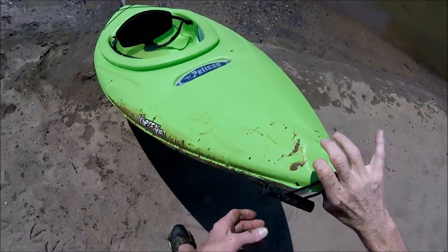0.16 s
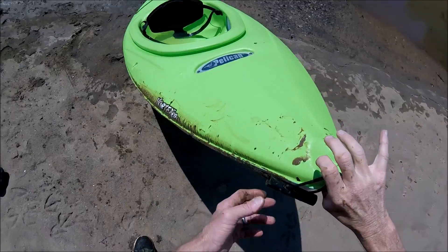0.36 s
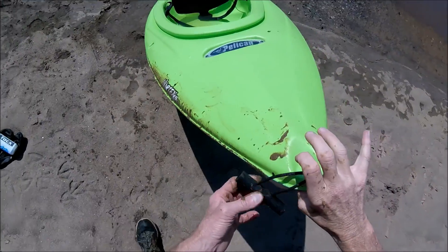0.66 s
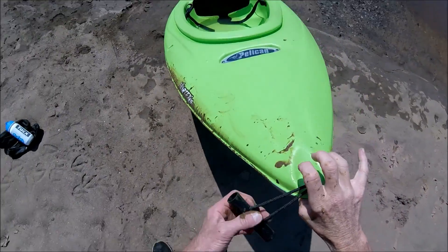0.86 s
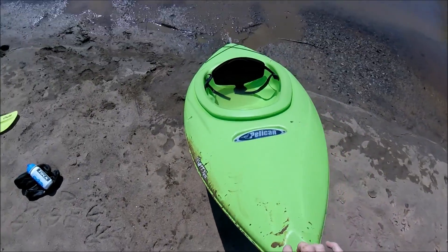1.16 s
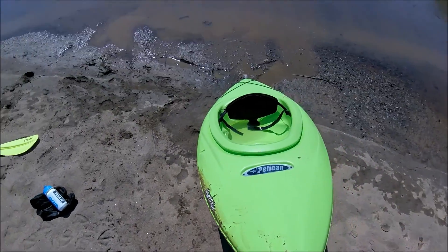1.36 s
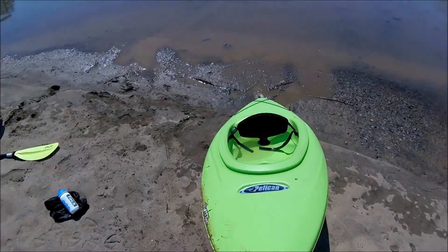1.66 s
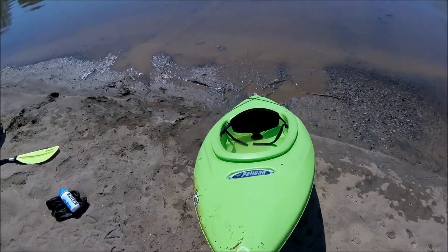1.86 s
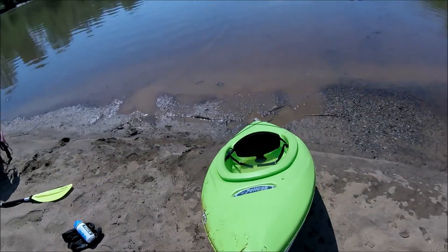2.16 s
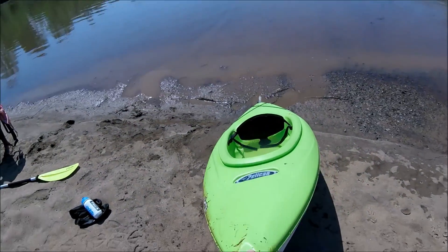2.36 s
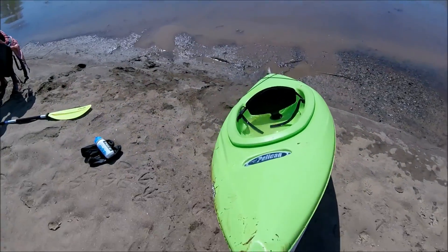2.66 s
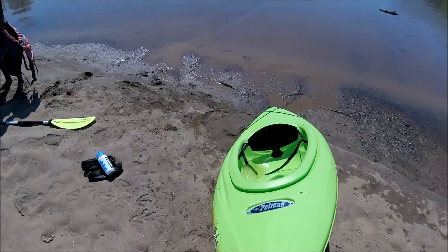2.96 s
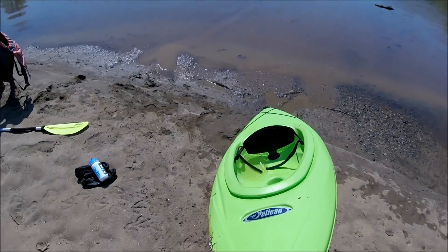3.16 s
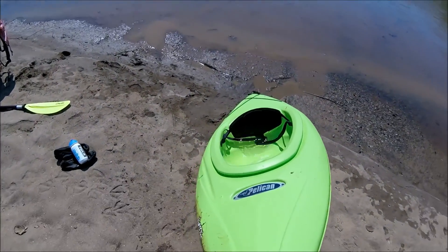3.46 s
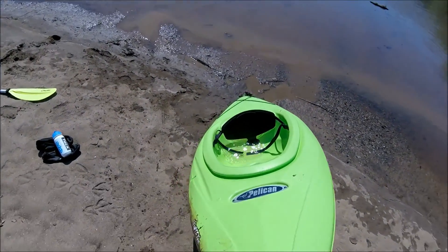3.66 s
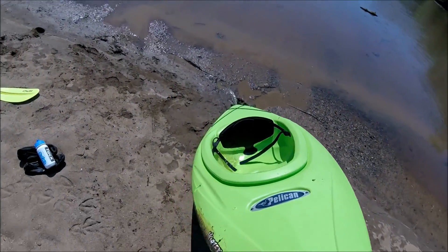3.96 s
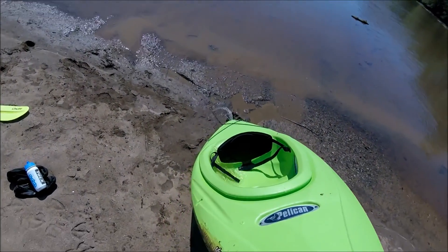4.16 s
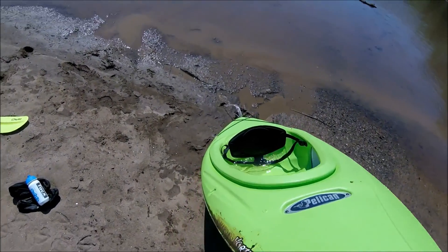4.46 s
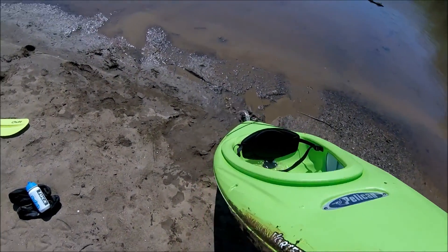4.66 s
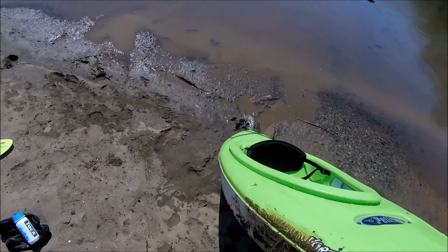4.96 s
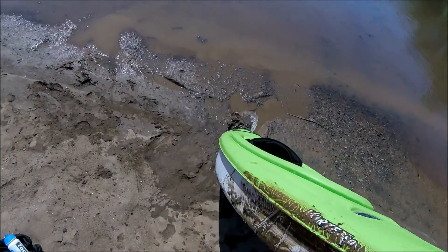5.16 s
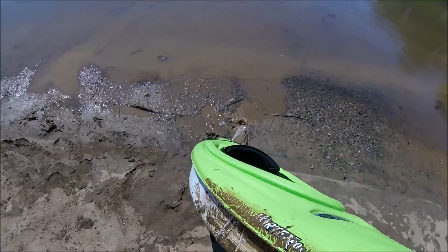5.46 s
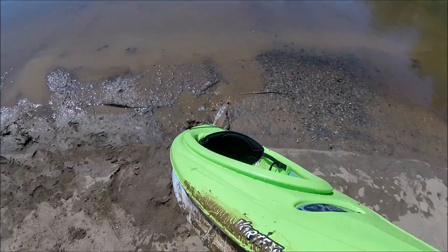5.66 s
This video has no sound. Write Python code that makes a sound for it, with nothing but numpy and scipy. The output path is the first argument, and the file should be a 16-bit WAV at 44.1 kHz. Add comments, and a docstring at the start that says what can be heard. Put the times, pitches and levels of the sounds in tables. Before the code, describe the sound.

For almost three seconds there is little but breeze rumble, faint air hush and scattered tiny bubble ticks in wet mud. Then a light hollow plastic hull is moved over sand: a hard crack, dull boxy knocks, short scuffs and low grating. Toward the end the knocks thin out and water trickles, plips and crackles with small stones. Near, dry, open-air perspective with wind on the microphone.

```python
"""A breeze of low-passed noise buffets the microphone over a steady hush, while bubble notes tick in wet mud.
The air in a hollow plastic kayak booms as a hand takes hold, then the hull slides down a wet sandy bank:
noise and grains hiss and crunch as sand, and coarse catches make the hull grumble.
Soon blows knock it into clicks, clacks and ringing modes, with jerky scuffs and soft thuds of its floor.
Toward the end water sloshes as swarms of tiny bubbles, with wet plips, droplets and ticking stones."""
import sys
import numpy as np
from scipy import signal
from scipy.fft import rfft, irfft, next_fast_len
from scipy.io import wavfile
from scipy.ndimage import uniform_filter1d, minimum_filter1d, map_coordinates

SR = 44100
rng = np.random.default_rng(int(sys.argv[2]) if len(sys.argv) > 2 else 0)


def master_out(mix):
    """Clip the mix to full scale and print it as 16-bit PCM to the path in sys.argv[1]."""
    frames = np.transpose(np.atleast_2d(mix))
    ceiling = np.clip(frames, -1, 1)
    pcm = np.round(ceiling * 32767).astype(np.int16)
    wavfile.write(sys.argv[1], SR, pcm)


N = 255824

# Blows on the hull. Each row: start in seconds, relative ring level in dB, contact click level in dB,
# treble gain on both in dB, struck panel's pitch in Hz, its level in dB, clack level in dB, clack pitch in Hz.
BLOWS = [(2.918, -31.5, -25, -21, 423, -36, -37, 700), (3.088, -30.5, -28.5, 7, 1540, -49, -38, 600),
         (3.209, -34, -49, -15, 298, -31, -44, 400), (3.378, -29, -41, -15, 990, -35, -34, 800),
         (3.415, -24, -52.5, 0, 1230, -23.5, -42, 900), (3.544, -29, -48, -16, 535, -27, -45, 600),
         (3.6426, -12.5, -5, 7, 422, -25, -12, 945), (3.6499, -28, -28, 4, 729, -21, -21, 1000),
         (3.6641, -35, -29, 2, 484, -28, -16, 1100), (3.754, -31.5, -35, -14, 695, -34.5, -32, 700),
         (3.859, -25, -39, 3, 1190, -24.5, -30, 1100), (4.004, -23.5, -14.5, -12, 2570, -38, -23, 1100),
         (4.012, -39, -26, 2, 4020, -35.5, -24.5, 1300), (4.1069, -22.5, -20.5, -26, 3000, -39, -21, 765),
         (4.271, -25, -25, -17, 786, -40, -26, 1100), (4.316, -25.5, -32, -18, 520, -28, -20.5, 660),
         (4.3604, -25, -18, -23, 550, -29, -19.5, 910), (4.401, -23, -22, -21, 547, -27, -23.5, 735),
         (4.505, -32, -36, -12, 1320, -44, -30, 1210), (4.618, -30, -17, -22, 509, -31, -30, 990),
         (4.7814, -27, -19, -8, 1630, -33, -26, 1170), (4.889, -36, -50, -15, 685, -37, -42, 800),
         (5.1428, -30, -19, -4, 704, -35, -21.5, 1500), (5.2036, -30.5, -23.5, -15, 269, -26.5, -19, 556),
         (5.332, -40, -40, -10, 447, -38, -43, 600), (5.515, -38, -39, -17, 937, -44, -38, 900)]
# Modes of the hull. Each row: pitch in Hz, relative level in dB, 60 dB decay time in seconds.
HULL_MODES = [(170, -9, .15), (256, -5, .14), (323, 2.5, .12), (420, .5, .13), (490, -4, .11),
              (530, -4, .11), (605, 1.5, .07), (754, -3, .17), (868, -7, .13), (1007, -13, .14),
              (1045, -7, .1), (1290, -3, .08), (1383, -5, .07), (1464, -15, .11), (1750, -8, .085),
              (1840, -7, .08), (2060, -9, .05), (2412, -10.5, .055), (3030, -11, .04), (3898, -10.5, .04),
              (4140, -13, .05)]
# The crowd of weaker shell modes. Each row: frequency in Hz, relative level in dB per Hz.
SHELL_SPECTRUM = [(40, -9), (160, 2), (350, 6), (750, -0.5), (1020, 4), (1260, 2), (1550, -3), (2100, -3),
                  (2750, -9), (3900, -5.5), (5000, -16), (6500, -21), (7800, -24), (14000, -27)]
# How long the shell modes last. Each row: frequency in Hz, 60 dB decay time in seconds.
SHELL_DECAY = [(200, 0.23), (1000, 0.15), (3000, 0.089), (9000, 0.011)]
# Colour of the contact click. Each row: frequency in Hz, relative level in dB per Hz.
CLICK_SPECTRUM = [(60, -34), (300, 16.5), (800, 10), (1600, 5), (3200, 6.5), (5000, -2.5), (6500, 1.5),
                  (8000, -6.5), (11300, -9.5), (12300, -99), (14000, -69)]
# Jerky scuffs of plastic on grit. Each row: start in seconds, length in seconds, level in dB, pitch in Hz.
SCUFF_EVENTS = [(.016, 0.024, -48, 1160), (3.207, 0.017, -47.5, 3600), (3.415, 0.029, -45.5, 2230),
                (3.483, .012, -41.5, 2140), (3.493, 0.022, -44.5, 1280), (3.501, 0.0093, -51, 3300),
                (3.869, 0.014, -44, 2480), (4.24, 0.065, -44, 1240), (4.362, .02, -39.5, 1690),
                (4.494, 0.023, -42.5, 1320), (4.625, 0.017, -39, 2680), (4.781, 0.0064, -39, 3400)]
# Slow flexing of the hull floor. Each row: start in seconds, peak level in dB, starting pitch in Hz.
FLOOR_THUDS = [(3.868, -28, 88), (3.898, -26, 156), (4.011, -37, 121), (4.313, -28, 90), (5.204, -35, 230)]
# Shoves of the hull over the sand. Each row: start in seconds, rise in seconds, fall in seconds,
# relative sand hiss level in dB, relative hull grumble level in dB.
SHOVE_EVENTS = [(2.24, 0.47, 0.3, -51.5, -47.5), (2.52, 0.29, 0.16, -51, -52.5),
                (3.07, 0.013, 0.36, -53.5, -52), (3.19, 0.024, 0.06, -65, -39.5),
                (3.25, 0.044, 0.45, -59, -44), (3.482, 0.0045, 0.082, -51.5, -63),
                (3.83, 0.07, 0.04, -58, -41), (4.17, 0.083, 0.15, -49, -46),
                (4.37, 0.041, 0.59, -55.5, -42.5), (4.71, 0.018, 0.05, -59, -70),
                (4.87, 0.0078, 0.37, -82, -45.5), (5.2, 0.034, 0.4, -60.5, -43),
                (5.32, 0.091, 0.37, -55, -51.5), (5.43, 0.097, 0.059, -56, -40),
                (5.58, 0.046, 0.31, -60, -66)]
# Colour of the sand's hiss. Each row: frequency in Hz, relative level in dB per Hz.
SAND_SPECTRUM = [(60, -22), (250, 10), (500, -6.5), (1000, 0), (1600, -1), (2250, 1.5), (2950, -3.5),
                 (3750, -0.5), (4800, -8.5), (6200, -8), (7200, -21.5), (9000, -23), (11000, -33),
                 (14000, -54)]
# Colour of the hull's grumble. Each row: frequency in Hz, relative level in dB per Hz.
GRUMBLE_SPECTRUM = [(30, -33), (90, 7), (170, 8), (250, 0.5), (320, 5), (520, -0.5), (750, -6), (1300, -18),
                    (2200, -16.5), (3200, -35), (10000, -42)]
# The hand takes hold of the hull. Each row: start in seconds, rise in seconds, fall in seconds, boom level in dB.
HAND_GRIPS = [(.35, 0.27, 0.8, -48)]
# Sloshes of water and wet mud. Each row: start in seconds, rise in seconds, fall in seconds, relative level in dB.
SLOSH_EVENTS = [(0, 0.03, 0.071, -49), (0, 0.36, 3, -55), (3.36, 0.11, 0.33, -55), (4.2, 0.19, 1.1, -47.5),
                (4.9, 0.3, 0.3, -51), (5.35, 0.38, 0.28, -48.5)]
# Colour of droplets and splashes. Each row: frequency in Hz, relative level in dB per Hz.
SPATTER_SPECTRUM = [(300, 9.5), (1500, -30), (3500, 13.5), (5000, 0), (6500, 0), (8000, -11.5),
                    (11300, -14), (14000, -30)]
# Single bubbles and wet ticks. Each row: start in seconds, peak level in dB, pitch in Hz,
# pitch rise as a share (negative falls), length in cycles.
SINGLE_BUBBLES = [(.0074, -44, 2240, 0.1, 13), (.116, -41.5, 2250, -0.11, 10),
                  (.1406, -45, 2220, 0.00072, 11), (0.2215, -46.5, 4020, 0.24, 40),
                  (0.296, -52, 2920, 0.76, 7.3), (0.769, -47, 3820, -0.32, 14),
                  (.817, -51, 1720, -0.33, 12), (0.873, -44.5, 3100, 0.15, 27),
                  (0.8747, -40, 1760, -0.041, 5.7), (.888, -46, 3870, 0.3, 22), (1.324, -45, 3520, 0.6, 16),
                  (3.305, -39.5, 2380, -0.05, 18), (4.193, -36.5, 1770, 0.27, 11),
                  (4.649, -42, 3000, -0.0022, 13.6), (4.7591, -34, 2460, -0.083, 5.5),
                  (4.9706, -40, 2100, -0.12, 14), (5.0474, -45, 2980, 0.36, 13),
                  (5.074, -36, 3360, 0.18, 21), (5.166, -33, 3580, -0.14, 10),
                  (5.183, -34.5, 1680, 0.4, 15), (5.206, -36, 2900, 0.94, 21),
                  (5.2604, -39.5, 3640, -0.13, 15), (5.368, -31, 2240, 0.065, 5.2),
                  (5.422, -33, 3800, -0.51, 7.3), (5.45, -38, 3620, 0.21, 24),
                  (5.465, -32.5, 3780, 0.25, 15), (5.498, -31.5, 2700, -0.047, 11),
                  (5.5794, -35.5, 3130, -0.58, 14), (5.618, -35, 3400, 0.33, 16),
                  (5.637, -42, 3050, -.15, 22), (5.6605, -34, 1550, 0.46, 5.9),
                  (5.669, -36.5, 1520, -.1, 21), (5.698, -37, 2440, 0.41, 17.2),
                  (5.7104, -39.5, 3720, -0.035, 14), (5.7443, -39, 2300, -0.25, 14),
                  (5.773, -34, 2500, -0.046, 7)]
# Spells of wet ticks in the mud and the slosh. Each row: start in seconds, end in seconds, typical peak in dB,
# first pitch in Hz, last pitch in Hz, ticks per second.
TICK_SPELLS = [(0, 0.058, -51.5, 3340, 3340, 360), (0.101, .95, -58, 3400, 3200, 35),
               (.408, 0.54, -48, 3100, 3700, 76), (0.87, .893, -50, 2800, 4200, 300),
               (1.32, 1.323, -51, 2900, 4000, 560), (1.807, 1.908, -50, 3270, 3800, 99),
               (4.591, 5.48, -46, 3300, 3000, 15), (5.443, 5.466, -41.5, 2900, 3900, 440),
               (5.498, 5.527, -43, 2650, 1110, 360), (5.555, 5.691, -40.5, 1800, 1490, 260),
               (5.604, 5.62, -40, 2300, 3630, 470), (5.635, 5.646, -38, 3200, 2400, 470),
               (5.664, 5.688, -42, 2820, 3770, 350), (5.694, 5.712, -39, 2080, 3300, 510),
               (5.728, 5.8, -45, 2280, 1900, 240)]
# Gusts on the microphone. Each row: start in seconds, rise in seconds, fall in seconds,
# relative level in dB, upper edge in Hz.
GUST_EVENTS = [(0, 0.01, 0.24, -39, 149), (.5, 0.1, 0.4, -49, 70), (1.07, 0.032, 0.14, -40.5, 79.4),
               (1.299, 0.13, 0.31, -44, 90), (2.52, 0.051, 0.16, -35.5, 52), (2.7, 0.042, 0.045, -32, 50),
               (2.801, 0.04, 0.051, -35, 55.7), (5.1, 0.22, 0.53, -45, 150)]
# Colour of the buffeting breeze. Each row: frequency in Hz, relative level in dB per Hz.
BREEZE_SPECTRUM = [(10, -9.5), (35, -0.5), (70, -0.5), (110, -9.5), (200, -22.5), (400, -26), (1500, -70)]
# Colour of the outdoor hush. Each row: frequency in Hz, relative level in dB per Hz.
HUSH_SPECTRUM = [(20, 7), (110, 7.5), (210, 8.5), (320, -1), (500, -1.5), (950, 0.5), (2000, -5.5),
                 (3700, -16), (4700, -26), (6000, -19.5), (8500, -16.5), (10000, -26), (12500, -26.5),
                 (14500, -29.5)]
# Resonances of the microphone's port. Each row: pitch in Hz, width in Hz, level in dB.
PORT_RESONANCES = [(6430, 500, 4.5), (11050, 190, -3.5)]
# The microphone's treble response. Each row: frequency in Hz, gain in dB.
TREBLE_RESPONSE = [(11300, -0.5), (12300, 2), (14400, -9)]

# a click as strong as its ring builds the ring up in RISE_S; each dB more click shortens that by RISE_SLOPE dB
RISE_S, RISE_SLOPE = 0.0029, 0.78
HOLD_S = .011  # how long a blow holds its strength before it fades
# a steady creep of the hull, under the later shoves
CREEP_START_S, CREEP_FADE_S, CREEP_HISS_DB, CREEP_GRUMBLE_DB = 3.02, 0.027, -62.5, -52.5
CEILING_DB, LIMITER_S = -4.5, .001  # the limiter's ceiling and reaction time
TOP_HZ = 14400  # band limit


def amp(db):
    """Decibels to gain."""
    return 10 ** (np.asarray(db) / 20)


def unit(x):
    """x at rms 1."""
    return x / np.sqrt(np.mean(x ** 2) + 1e-20)


def along(points, hz):
    """(Hz, value) points read on a log axis."""
    f, v = np.transpose(points)
    return np.interp(np.log(hz + 1), np.log(f + 1), v)


def wobble(rate):
    """A smooth random curve, rate knots a second."""
    knots = rng.standard_normal(int(N * rate / SR) + 4)
    return map_coordinates(knots, [np.arange(N) * rate / SR])


def filtered(x, response):
    """x times a complex response of frequency."""
    m = next_fast_len(len(x) + SR // 4)
    return irfft(rfft(x, m) * response(np.fft.rfftfreq(m, 1 / SR)), m)[:len(x)]


def coloured(x, spectrum):
    """x through a causal minimum-phase filter with the given spectrum, at rms 1."""
    size = 4096
    cepstrum = irfft(np.log(amp(along(spectrum, np.fft.rfftfreq(size, 1 / SR)))))
    # folding the cepstrum forward in time makes the filter causal
    cepstrum[1:size // 2] *= 2
    cepstrum[size // 2 + 1:] = 0
    impulse = irfft(np.exp(rfft(cepstrum)))
    return unit(signal.fftconvolve(x, impulse)[:len(x)])


def lowpassed(x, order, hz):
    """x through a gentle low-pass."""
    return signal.sosfilt(signal.butter(order, hz, fs=SR, output="sos"), x)


def add(track, s, sound):
    """Mix a sound into the track at time s."""
    room = track[max(round(s * SR), 0):][:len(sound)]
    room += sound[:len(room)]


def swells(rows, column=0):
    """Gain over time: each row swells and dies away along quarter sines; overlaps add in power."""
    t, power = np.arange(N) / SR, np.zeros(N)
    for s, rise_s, fall_s, *db in rows:
        reach = np.interp(t, s + np.cumsum([0, rise_s, fall_s]), [0, 1, 0])
        power += (amp(db[column]) * np.sin(np.pi / 2 * reach)) ** 2
    return np.sqrt(power)


def resonance(f, hz, width_hz):
    """Complex response of one damped resonance."""
    return 1j * f * width_hz / (hz * hz - f * f + 1j * f * width_hz)


def grit(rate, spread_db):
    """Random tiny impulses of uneven size, rate a second on average, at rms 1."""
    sizes = amp(spread_db * (2 * rng.random(N) - 1))
    hits = rng.random(N) < rate / SR
    return unit(hits * np.sign(rng.standard_normal(N)) * sizes)


def bubble(hz, cycles, rise):
    """A bubble starts quickly and rings for some cycles, gliding in pitch; its envelope peaks at 1."""
    life = cycles / hz
    u = np.arange(int(2 * life * SR) + 2) / (life * SR)
    swell = 4 * u * np.exp(1 - 4 * u)
    return swell * np.sin(2 * np.pi * cycles * (u + rise * (u * u - u) / 2))


def grains(hz, pitch_spread, cycles, size_db, rise, count):
    """A random swarm of tiny damped notes, each with its own pitch, size and life; rms 1."""
    out = np.zeros(N)
    times = rng.uniform(0, N / SR, count)
    variety = np.clip(rng.standard_normal((count, 4)), -2, 2)
    for s, (pitch, big, life, glide) in zip(times, variety):
        note = bubble(hz * np.exp(pitch_spread * pitch), cycles * np.exp(life / 2), rise * (1 + glide))
        add(out, s, amp(size_db * big) * note)
    return unit(out)


def knocks(ring_db=-19, shell_db=-24, chatter_db=-12, chatter_s=0.032, chatter_hz=5000, treble_hz=2800):
    """Each blow clicks, clacks and chatters, and rings the hollow hull and the struck panel."""
    out, t = np.zeros(N), np.arange(SR // 4) / SR
    for s, db, click_db, treble_db, panel_hz, panel_db, clack_db, clack_hz in BLOWS:
        rise = 1 - np.exp(-t / (RISE_S * amp(RISE_SLOPE * (db - click_db))))
        ring = (amp(ring_db) * hull_ring(t) + amp(shell_db) * shell_ring(t)) * rise
        rebounds = np.zeros(len(t))
        for delay in rng.uniform(chatter_s / 4, chatter_s, size=3):
            add(rebounds, delay, amp([chatter_db]) * np.exp(-delay / chatter_s))
        rebounds = lowpassed(rebounds, 2, chatter_hz)
        click = coloured(rebounds - signal.unit_impulse(len(t)), CLICK_SPECTRUM)
        blow = amp(db) * ring + amp(click_db) * click / np.abs(click).max()
        # a harder contact puts more into the treble
        dull = lowpassed(blow, 1, treble_hz)
        struck = dull + amp(treble_db) * (blow - dull)
        panel = amp(panel_db) * rise * panel_ring(t, panel_hz)
        add(out, s, struck + panel + amp(clack_db) * clack(t, clack_hz))
    return out


def hull_ring(t):
    """The hull's modes swing in alternate directions, in a new mix for each point of contact; rms 1."""
    hz, db, t60 = np.transpose(HULL_MODES)[:, :, None]
    direction = (-1) ** np.arange(len(hz))[:, None]
    level = amp(db + rng.standard_normal(hz.shape)) * fading(t, t60) * direction
    phase = rng.uniform(-1.3, 1, hz.shape)
    return unit((level * np.sin(2 * np.pi * hz * t + phase)).sum(0))


def shell_ring(t):
    """Dense shell modes: noise whose treble dies first; rms 1."""
    noise = coloured(rng.standard_normal(len(t)), SHELL_SPECTRUM)
    hz, s, z = signal.stft(noise, SR, nperseg=256)
    decayed = z * fading(s, along(SHELL_DECAY, hz)[:, None])
    return unit(signal.istft(decayed, SR, nperseg=256)[1][:len(t)])


def panel_ring(t, hz, spread=0.032, t60_s=0.11, damping_hz=1500):
    """The struck patch of wall rings with a few close modes, more briefly the higher they lie."""
    modes = hz * (1 + spread * rng.uniform(-1, 1, (3, 1)))
    return np.sin(2 * np.pi * modes * t).mean(0) * fading(t, t60_s / (1 + hz / damping_hz))


def fading(t, t60):
    """A blow circles the shell for a moment near full strength, then dies away."""
    return amp(-60 * (np.hypot(t, HOLD_S) - HOLD_S) / t60)


def clack(t, hz):
    """The wall dents in and springs back: one strong cycle that stops almost at once."""
    return -np.sin(2 * np.pi * hz * t) * np.exp(-(hz * t) ** 2 / 2)


def scuffs(slip_s=.0045, size_db=3, width=0.11, scatter=0.14):
    """The plastic catches on grit and slips in uneven jerks; each rings the wall near that spot's pitch."""
    out, t = np.zeros(N), np.arange(SR // 100) / SR
    count = 24  # most jerks a scuff can hold
    for s, length_s, db, hz in SCUFF_EVENTS:
        jerks = np.zeros(SR // 8)
        gaps = slip_s * rng.uniform(.5, 1.5, count)
        for at, (big, pitch) in zip(np.cumsum(gaps) - gaps[0], rng.standard_normal((count, 2))):
            if at < length_s:
                note = np.sin(2 * np.pi * hz * np.exp(scatter * pitch) * t)
                add(jerks, at, amp(size_db * big) * note * np.exp(-np.pi * width * hz * t))
        # the level holds over the scuff's length, not the whole buffer
        add(out, s, amp(db) * unit(jerks) * np.sqrt(length_s * SR / len(jerks)))
    return out


def flexing(swell_s=0.01, sag=1.0):
    """The thin floor bulges with a soft thud that sags in pitch."""
    out, t = np.zeros(N), np.arange(SR // 8) / SR
    for s, db, hz in FLOOR_THUDS:
        swell = (t / swell_s * np.exp(1 - t / swell_s)) ** 2
        add(out, s, amp(db) * swell * np.sin(2 * np.pi * hz * t * (1 - sag * t)))
    return out


def friction():
    """Gains of the sand's hiss and the hull's grumble: shoves on top of a slow creep."""
    creep = np.clip((np.arange(N) / SR - CREEP_START_S) / CREEP_FADE_S, 0, 1)
    speed = np.hypot(swells(SHOVE_EVENTS), creep * amp(CREEP_HISS_DB))
    drag = np.hypot(swells(SHOVE_EVENTS, column=1), creep * amp(CREEP_GRUMBLE_DB))
    return speed, drag


def sliding(speed, drag, hiss_db=7.0, grumble_db=0, grain_db=-6, ring_share=0.17, smooth_db=1.3, rough_db=-0.5):
    """Sand hisses under the keel, more raggedly the harder it drags; coarser catches make the hull grumble."""
    catch = wobble(45)
    scratch = smooth_db * catch + rough_db * drag / drag.max() * wobble(130)
    grain = amp(grain_db) * grit(rate=650, spread_db=7.5)
    sand = coloured(rng.standard_normal(N) + grain, SAND_SPECTRUM)
    rub = coloured(grit(rate=830, spread_db=1.5), GRUMBLE_SPECTRUM)
    ring = unit(signal.fftconvolve(rub, hull_ring(np.arange(SR // 4) / SR))[:N])
    grumble = unit(rub + ring_share * ring)
    hiss = speed * amp(hiss_db + scratch) * sand
    return hiss + drag * amp(grumble_db + 1.58 * catch) * grumble


def rasp(speed, rasp_db=-4.5, rasp_hz=1300):
    """Coarse grit catches under the sliding hull in a rough mid-pitched crunch."""
    crunch = grains(rasp_hz, pitch_spread=0.477, cycles=2.8, size_db=1.5, rise=0, count=1800)
    return speed * amp(rasp_db) * crunch


def cockpit(drag, boom_hz=116, width_hz=22, rest_db=-59, drag_db=-49, follow=0.46):
    """Air in the hull booms through the cockpit: faintly at rest, more under the hand and as it drags."""
    hum = filtered(rng.standard_normal(N), lambda f: resonance(f, boom_hz, width_hz) ** 2)
    handled = np.hypot(amp(rest_db), swells(HAND_GRIPS))
    return np.hypot(handled, amp(drag_db) * unit(drag) ** follow) * unit(hum)


def water(stir, bubble_hz=2500, pitch_spread=0.43, cycles=4, size_db=4, rise=0.11, swarm_db=-5.5, spatter_db=-11):
    """A dense crackle of tiny bubbles and droplets in the mud and the slosh."""
    swarm = grains(bubble_hz, pitch_spread, cycles, size_db, rise, count=3000)
    # fine droplets land in soft clumps
    droplets = grit(rate=1500, spread_db=3) * amp(6 * np.tanh(wobble(70)))
    return stir * (amp(swarm_db) * swarm + amp(spatter_db) * coloured(droplets, SPATTER_SPECTRUM))


def plips(plip_db=0, snap_db=-5, satellite_db=-9, satellite_s=.01, pitch_spread=.25):
    """Single bubbles open with a short note and shed a few quieter, briefer ones."""
    out, t = np.zeros(N), np.arange(SR // 50) / SR
    for s, db, hz, glide, cycles in SINGLE_BUBBLES:
        add(out, s, amp(db + plip_db) * bubble(hz, cycles, glide))
        for delay, pitch in zip(satellite_s * rng.random(size=3), rng.standard_normal(size=3)):
            satellite = bubble(hz * np.exp(pitch_spread * pitch), cycles / 2, glide)
            add(out, s + delay, amp(db + satellite_db) * satellite)
        # the film tears with a tiny splash as the bubble opens
        splash = coloured(rng.standard_normal(len(t)), SPATTER_SPECTRUM) * amp(-60 * t / 0.053)
        add(out, s, amp(db + snap_db) * splash / np.abs(splash).max())
    return out


def ticks(pitch_spread=0.18, cycles=6, size_db=2, rise=0.2):
    """Small bubbles burst unevenly through each spell, drifting in pitch as the mud pocket fills or opens."""
    out = np.zeros(N)
    count = 48  # most ticks a spell can hold
    for start, end, db, first_hz, last_hz, rate in TICK_SPELLS:
        times = start + (np.arange(count) + rng.random(count)) / rate
        variety = np.clip(rng.standard_normal((count, 4)), -2, 2)
        for s, (big, pitch, glide, life) in zip(times, variety):
            if s < end:
                hz = np.interp(s, [start, end], [first_hz, last_hz]) * np.exp(pitch_spread * pitch)
                note = bubble(hz, cycles * np.exp(life / 2), rise * (1 + glide))
                add(out, s, amp(db + size_db * big) * note)
    return out


def gravel(stir, crack_db=-9.5, stone_hz=3800):
    """Small wet stones tick against each other, each at its own pitch, wherever the mud is stirred."""
    stones = grains(stone_hz, pitch_spread=0.19, cycles=4.2, size_db=6, rise=0, count=450)
    return stir * amp(crack_db) * stones


def air(hush_db=-50, lull_db=-47, gust_db=2):
    """The steady hush of the open river bank, and the breeze on the microphone, gusting over a lull."""
    hush = amp(hush_db + wobble(3.5) / 2) * coloured(rng.standard_normal(N), HUSH_SPECTRUM)
    breeze = amp(lull_db) * coloured(rng.standard_normal(N), BREEZE_SPECTRUM)
    eddies = coloured(rng.standard_normal(N), BREEZE_SPECTRUM)
    for *gust, edge_hz in GUST_EVENTS:
        deep = unit(lowpassed(eddies, 2, edge_hz))
        breeze += amp(gust_db) * swells([gust]) * deep
    return hush + breeze * amp(1.05 * wobble(18) + wobble(48))


def scene(seep_db=-64):
    """Everything as it reaches the microphone; the wet mud seeps faintly between sloshes."""
    speed, drag = friction()
    stir = np.hypot(amp(seep_db), swells(SLOSH_EVENTS))
    hull = knocks() + scuffs() + flexing()
    slide = sliding(speed, drag) + rasp(speed) + cockpit(drag)
    wet = water(stir) + gravel(stir) + plips() + ticks()
    return (hull + slide + wet + air())[None]


def record(dry):
    """The microphone's port colours the treble, a limiter ducks hard peaks, and the top is cut at the band limit."""
    def port(f):
        """Direct sound plus the port's resonances."""
        return 1 + sum(amp(db) * resonance(f, hz, width_hz) for hz, width_hz, db in PORT_RESONANCES)

    x, size = filtered(dry[0], port), round(LIMITER_S * SR)
    needed = 1 / np.maximum(1, np.abs(x) / amp(CEILING_DB))
    x = x * uniform_filter1d(minimum_filter1d(needed, size), size)
    return filtered(x, lambda f: amp(along(TREBLE_RESPONSE, f)) * (f < TOP_HZ))[None]


dry = scene()
out = record(dry)
master_out(out)
```